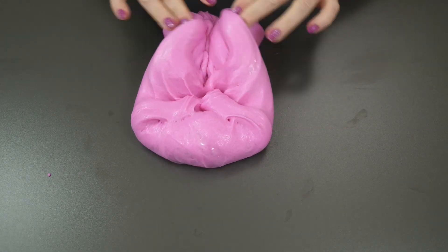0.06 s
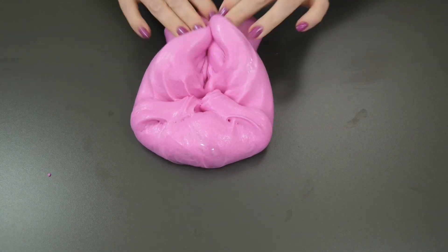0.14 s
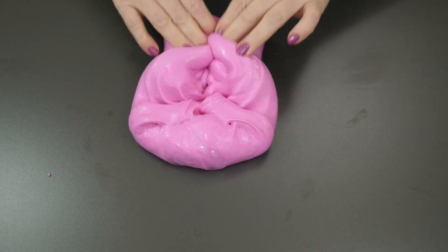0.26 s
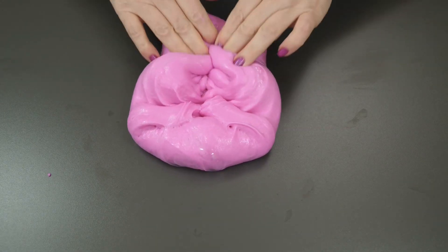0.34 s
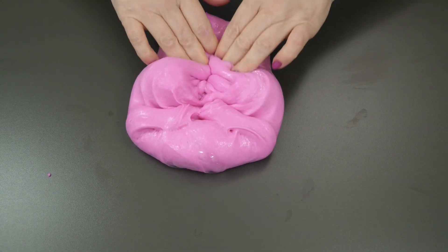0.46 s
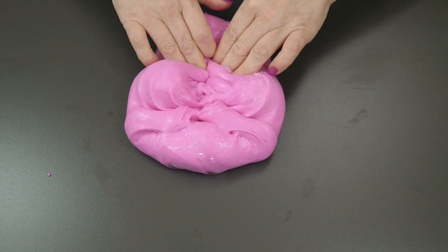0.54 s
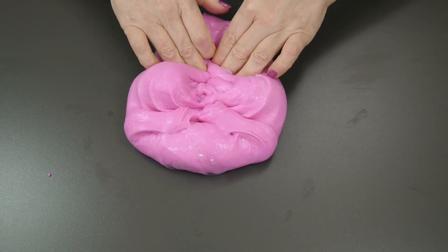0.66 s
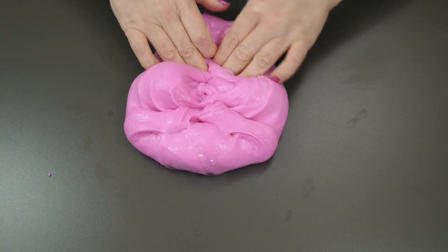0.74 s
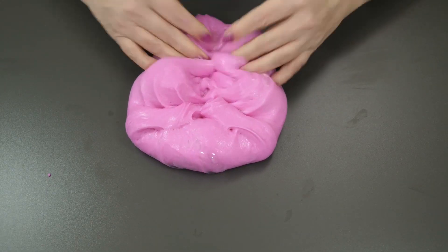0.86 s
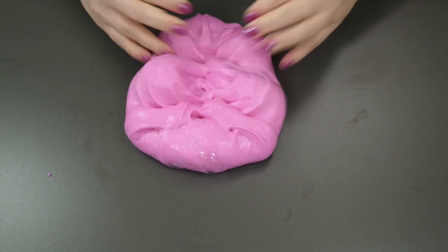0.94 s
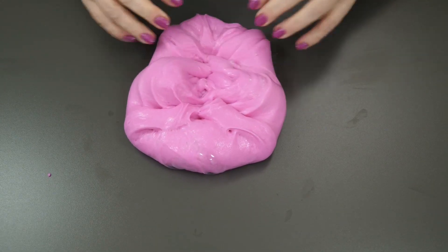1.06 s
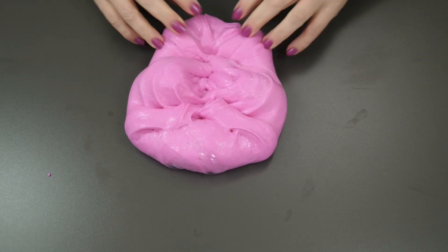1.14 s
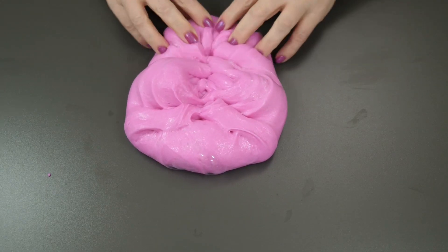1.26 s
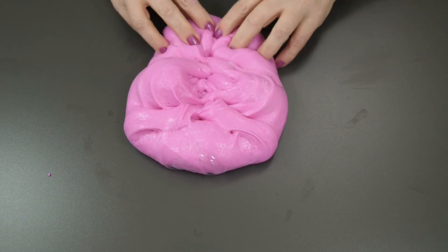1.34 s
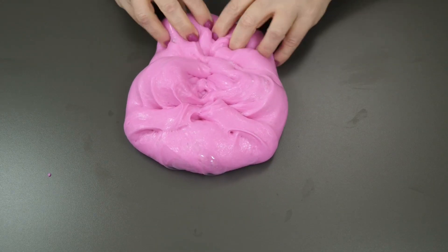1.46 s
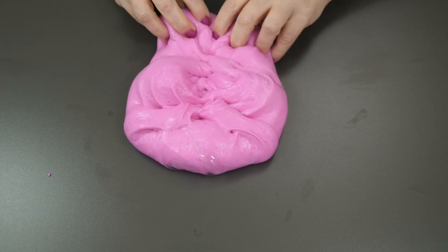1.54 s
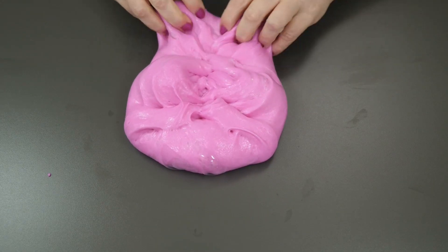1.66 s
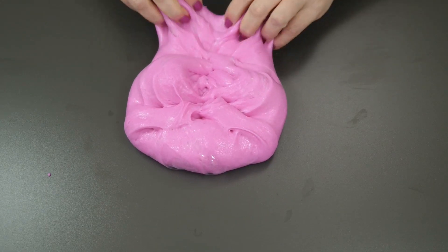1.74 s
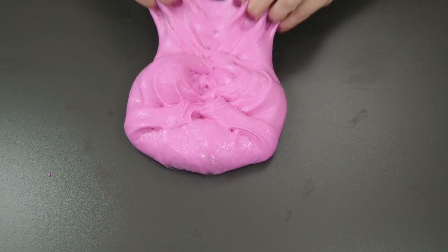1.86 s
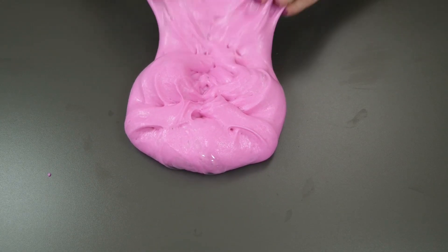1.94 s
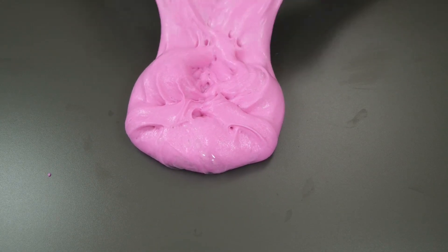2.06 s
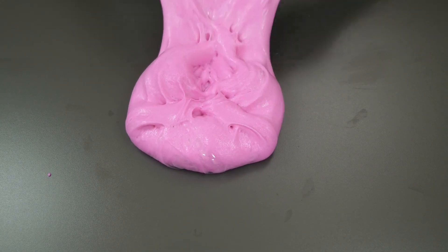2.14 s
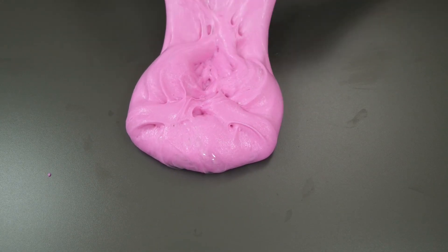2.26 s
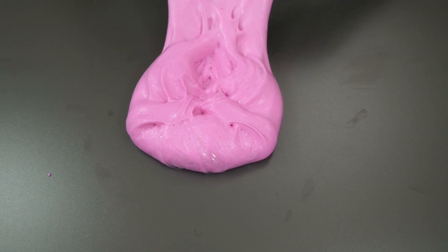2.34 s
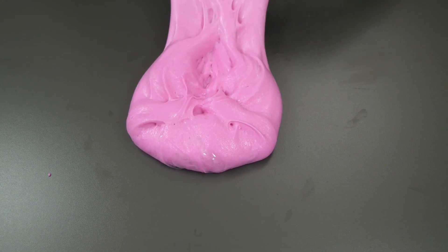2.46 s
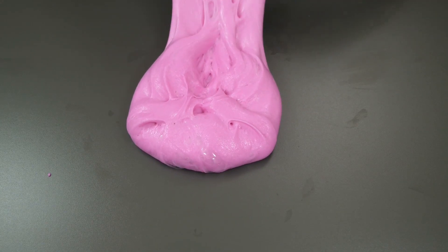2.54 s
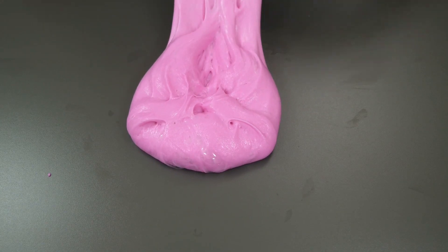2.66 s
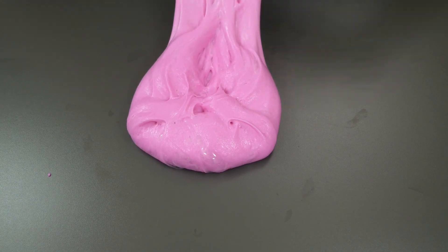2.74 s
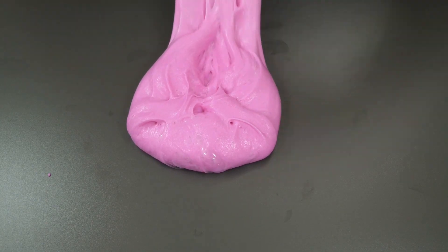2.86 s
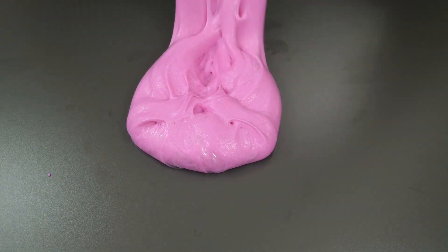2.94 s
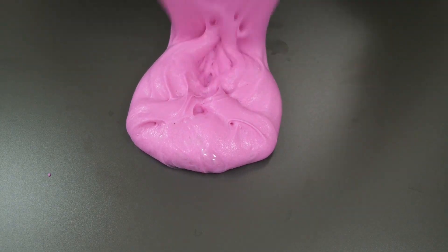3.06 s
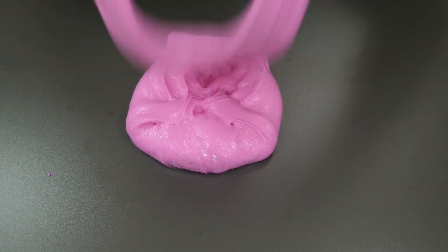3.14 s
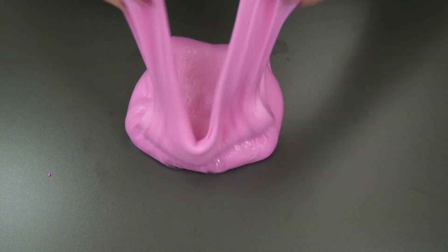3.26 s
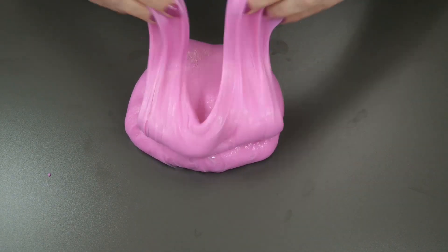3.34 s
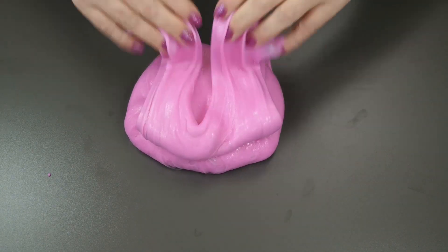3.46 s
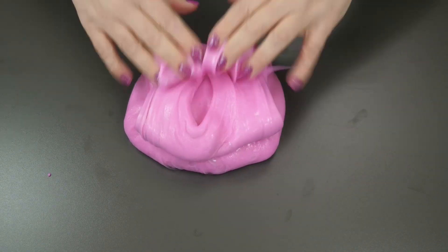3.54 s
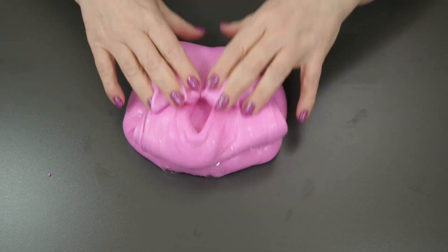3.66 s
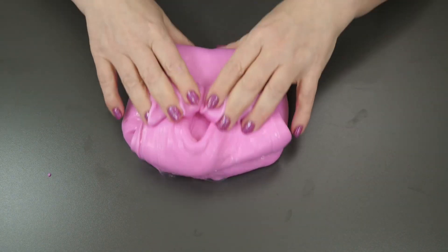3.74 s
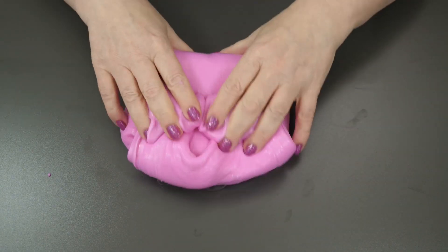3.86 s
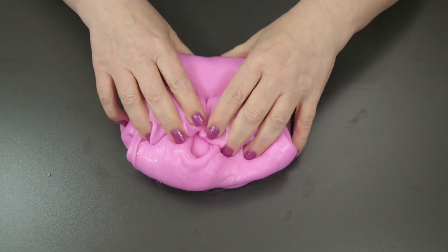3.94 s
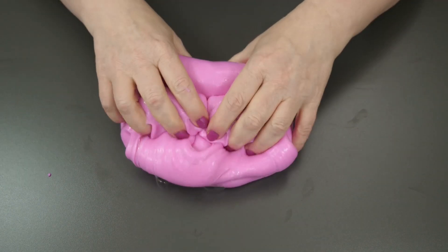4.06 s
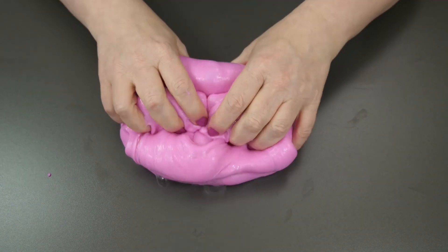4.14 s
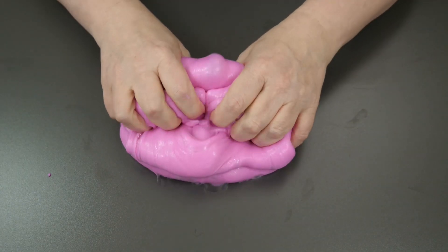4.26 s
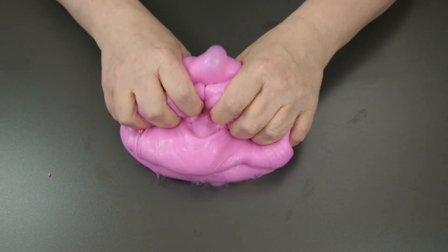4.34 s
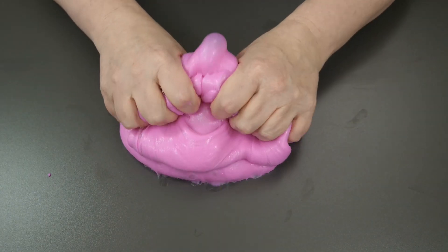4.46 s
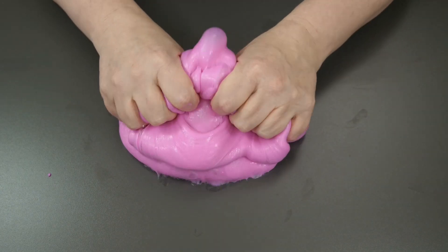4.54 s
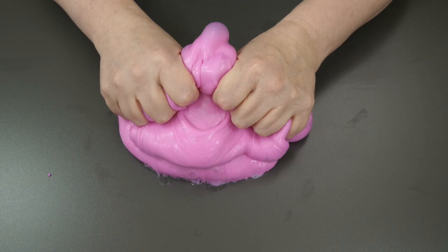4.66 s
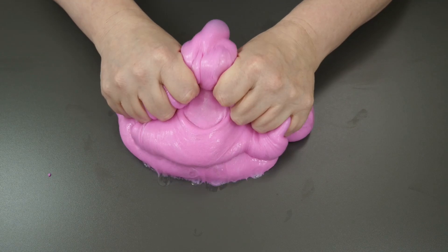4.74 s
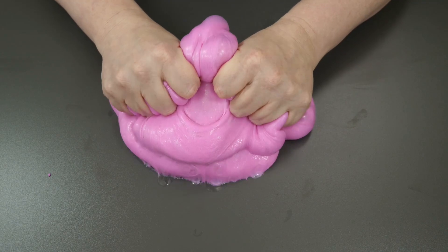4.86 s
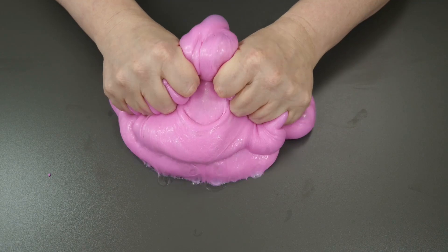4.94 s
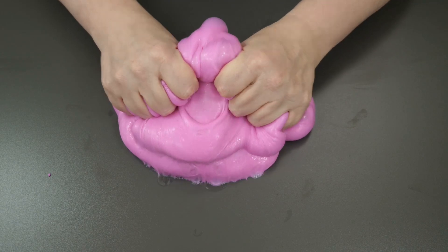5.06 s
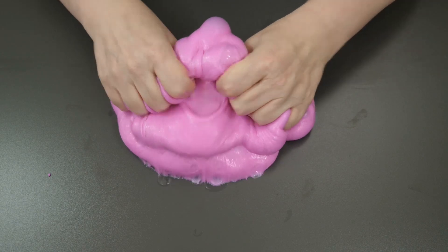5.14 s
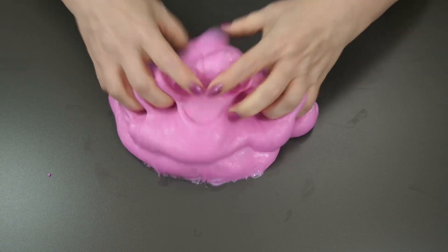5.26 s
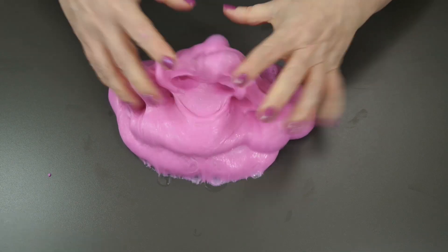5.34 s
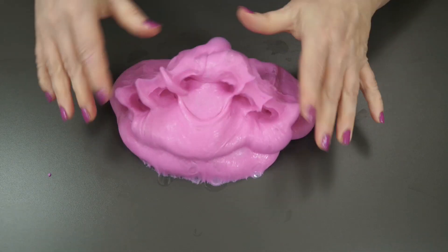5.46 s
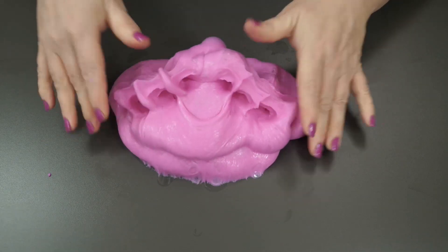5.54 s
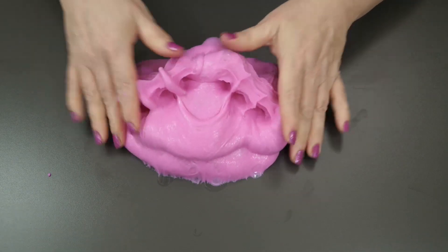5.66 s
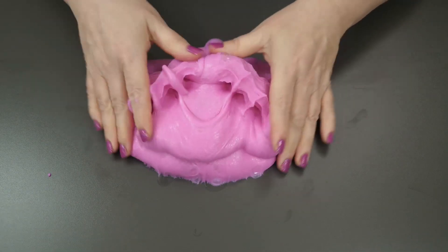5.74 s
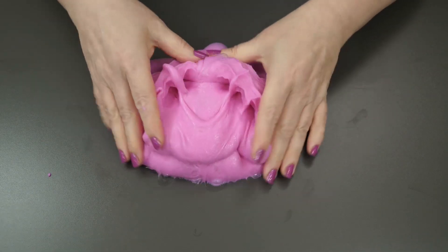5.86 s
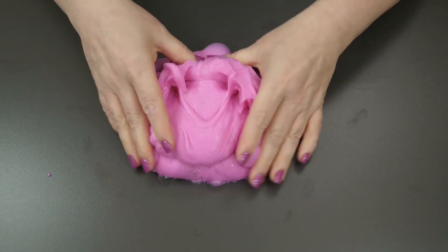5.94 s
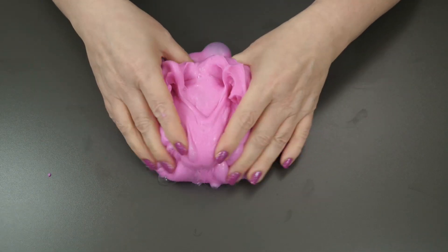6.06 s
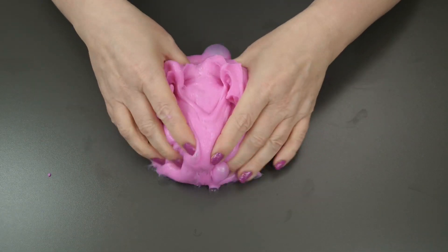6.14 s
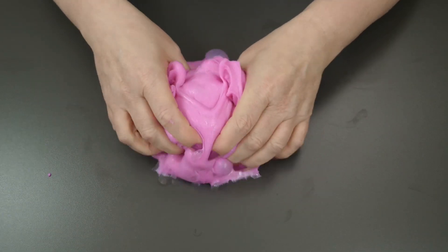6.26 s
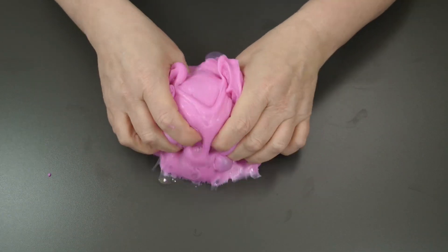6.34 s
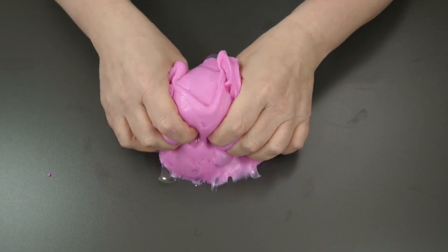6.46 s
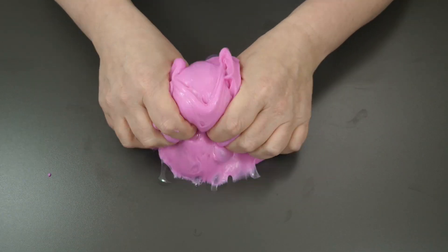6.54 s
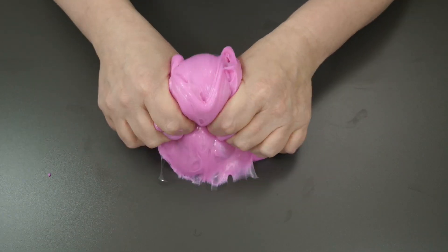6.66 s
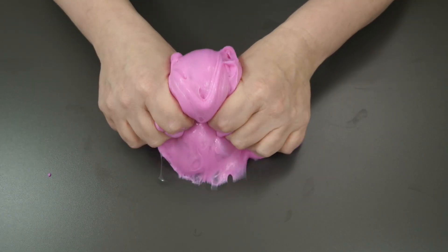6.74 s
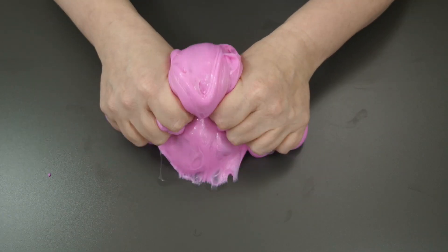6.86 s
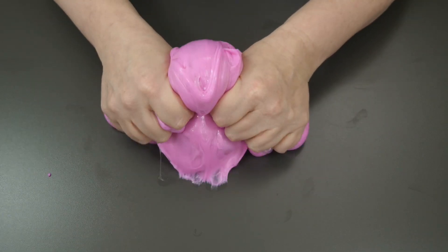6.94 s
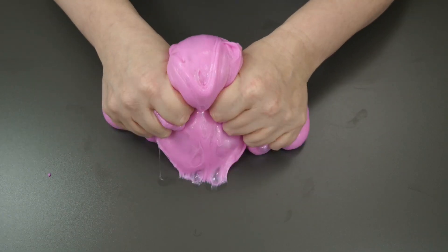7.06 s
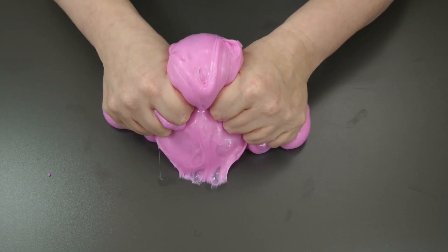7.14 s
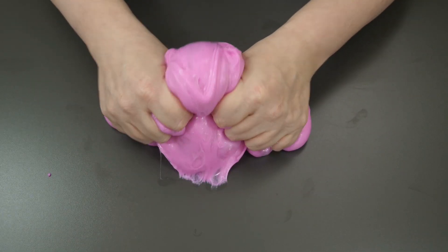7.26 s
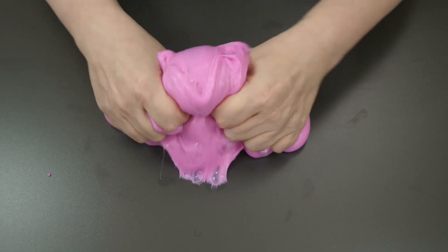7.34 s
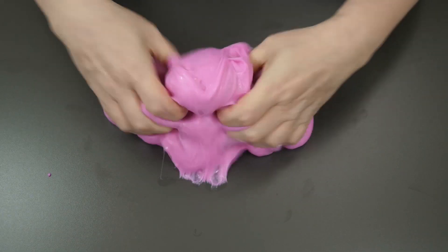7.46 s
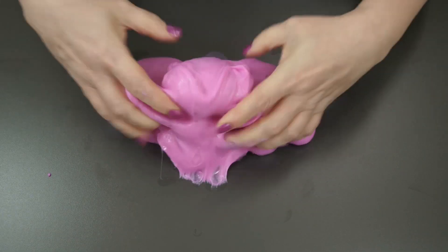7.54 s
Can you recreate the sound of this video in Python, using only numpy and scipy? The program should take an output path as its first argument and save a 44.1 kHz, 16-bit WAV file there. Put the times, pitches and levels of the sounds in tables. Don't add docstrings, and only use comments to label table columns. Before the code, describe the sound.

Wet, sticky crackling heard very close in stereo. Mostly quiet at first, with tiny clicks, one thudding cluster of pops and a smaller fold slap; then a squeeze bursts into bright, irregular snaps and fizzing air. A wet peel and a lull follow, then a second, denser crackle and a final squelchy release. Soft table thuds, short bare-room ring, steady faint hiss.

```python
import sys
import numpy as np
from scipy import signal
from scipy.fft import rfft, irfft
from scipy.io import wavfile
from scipy.ndimage import uniform_filter1d

SR = 44100
rng = np.random.default_rng(int(sys.argv[2]) if len(sys.argv) > 2 else 0)


def makeup_ratio(level_db):
    decades = np.asarray(level_db, float) / 20
    return 10 ** decades


def to_wav(s):
    ch = np.atleast_2d(s).T
    pcm = np.round(np.clip(ch, -1, 1) * 32767)
    wavfile.write(sys.argv[1], SR, pcm.astype(np.int16))


N = 335160

# start_s, length_s, table rumble level_db, wet squelch level_db, sticky fizz level_db
TEARS = [(0.872, 0.077, -51, -32, -37.5), (0.913, 0.01, -60, -28, -30), (0.921, 0.004, -38, -17, -34),
         (0.954, 0.049, -28, -34, -34.5), (3.267, 0.0067, -26, -35, -37), (4.456, 0.06, -58, -27.5, -28),
         (4.544, 0.35, -62, -26.5, -27), (4.864, 0.15, -46, -47, -28), (6.568, 0.12, -60, -46, -37.5),
         (6.394, 0.045, -42, -41, -41), (6.821, 0.081, -57, -34, -23), (6.937, 0.051, -62, -57, -32.5),
         (7.026, 0.098, -65, -31.5, -18), (7.152, 0.05, -62, -44, -30.5)]
# peak_s, length_s, rumble level_db, squelch level_db, fizz level_db
PEELS = [
    (0.04, 0.13, -52, -41.5, -45),
    (3.556, 0.026, -60, -59, -48.5),
    (5.222, 0.092, -48.5, -22, -27.5),
    (1.01, 0.025, -43, -39, -59),
    (5.297, 0.15, -33.5, -29.5, -33.5),
    (5.387, 0.025, -39, -33.5, -35.5),
    (7.46, 0.12, -32, -21, -27),
    (7.577, 0.073, -35, -28.5, -34.5),
]


def rms_one(x):
    return x / np.sqrt(np.mean(x ** 2) + 1e-20)


def at_hz(points, hz, column=1):
    points = np.array(points)
    return np.interp(np.log(hz), np.log(points[:, 0]), points[:, column])


def drift(rate_hz):
    step = 40
    r = np.exp(-2 * np.pi * step * rate_hz / SR)
    noise = rng.standard_normal(N // step + 2002)
    slow = signal.lfilter([1], [1, -2 * r, r * r], noise)[2000:]
    return np.interp(np.arange(N) / step, np.arange(len(slow)), rms_one(slow))


def coloured(pair, spectrum):
    # pitch_hz, likeness (1 = same)
    likeness = [(60, 0.79), (140, 0.45), (300, 0.17), (950, 0.19), (3770, -0.036), (15000, -0.0024)]
    hz = np.maximum(np.fft.rfftfreq(N, 1 / SR), 1)
    mid, side = rfft(pair) * makeup_ratio(at_hz(spectrum, hz))
    alike = np.clip(at_hz(likeness, hz), -1, 1)
    stereo = np.sqrt(1 + alike) * mid + np.sqrt(1 - alike) * side * [[1], [-1]]
    return rms_one(irfft(stereo, N))


def grains(per_s, spread_db):
    sizes = makeup_ratio(spread_db * np.minimum(rng.exponential(1, (2, N)), 5))
    signs = rng.choice([-1, 1], (2, N))
    return sizes * signs * (rng.random((2, N)) < per_s / SR)


def add(track, s, wave):
    i = round(s * SR)
    track[:, i:i + wave.shape[1]] += wave[:, :N - i]


def burst(hz, cycles, lag_s, tear, rough, swell, chance):
    t = np.arange(chance.shape[1]) / SR - np.array([[lag_s / 2], [-lag_s / 2]]) - 1e-4
    turns = np.maximum(t, 0) * hz
    band = signal.butter(1, [hz / 1.8, min(hz * 1.67, .45 * SR)], "band", fs=SR, output="sos")
    ragged = rms_one(signal.sosfilt(band, chance))
    ring = (np.sin(2 * np.pi * turns) + rough * ragged) * turns ** swell * np.exp(-turns / cycles)
    wave = ring + tear * turns * np.exp(-turns / 0.17)
    return wave / np.max(np.abs(wave))


def hiss():
    # pitch_hz, level_db per Hz
    hiss_colour = [(59, -13), (100, -2.5), (302, -7), (1100, -15.5), (1230, -16), (11400, -23),
                   (15000, -23), (16000, -21)]
    return makeup_ratio(-53.5) * coloured(rng.standard_normal((2, N)), hiss_colour)


def room(x):
    # pitch_hz, time to fall 60 dB in s, level_db
    wall_ring = [(143, 0.35, 1.5), (700, 0.26, -4), (2470, 0.31, -1), (6500, 0.083, 5), (11800, 0.19, -7)]
    t = np.arange(SR // 2) / SR
    white, tail = rng.standard_normal((2, len(t))), 0
    edges = 60 * 2.25 ** np.arange(8)
    for k, (low, high) in enumerate(zip(edges, edges[1:])):
        hz = np.sqrt(low * high)
        band = signal.sosfilt(signal.butter(2, [low, high], "band", fs=SR, output="sos"), white)
        alike = np.clip(350 / hz, 0, .95)
        band = np.sqrt(1 + alike) * band[0] + np.sqrt(1 - alike) * band[1] * [[1], [-1]]
        fade_db = at_hz(wall_ring, hz, column=2) - 60 * t / at_hz(wall_ring, hz)
        tail = tail + (-1) ** k * band * makeup_ratio(fade_db)
    tail = tail * np.clip((t - .0025) / 0.000047, 0, 1) / np.sqrt(0.088 * SR)
    return signal.fftconvolve(x.mean(axis=0, keepdims=True), tail, axes=1)[:, :N]


def early_echoes(x):
    # delay_s, level_db
    surfaces = [
        (.00136, -8.5),
        (.0037, -23),
    ]
    out = x.copy()
    for s, db in surfaces:
        out += makeup_ratio(db) * np.pad(x, ((0, 0), (round(s * SR), 0)))[:, :N]
    return out


def handwork():
    # start_s, weight on the table level_db, stretch of the skin level_db
    hands = [(0, -45, -54), (.3, -48, -60), (.8, -47.5, -60), (1.25, -46, -64.5), (1.42, -41, -45.5),
             (1.475, -50, -47.5), (1.53, -45, -45), (1.66, -51, -54), (1.8, -47, -47.5), (1.87, -48.5, -41),
             (2.15, -50.5, -60), (3.3, -48, -60.5), (3.53, -47, -55.5), (3.7, -45.5, -54.5),
             (4.0, -49, -52.5), (4.4, -47, -54), (5.1, -50.5, -50.5), (5.6, -43.5, -63.5),
             (5.95, -39, -49.5), (6.6, -45, -53), (7.6, -49.5, -48)]
    s, weight_db, stretch_db = np.transpose(hands)
    t = np.arange(N) / SR
    return np.interp(t, s, weight_db), np.interp(t, s, stretch_db)


def tearing(steady_db, column, lag_s=0, pace=1):
    sag_db_per_s, fall_db_per_s = 101.5, 295
    events = np.transpose(TEARS + PEELS)[:, :, None]
    start, length, peaks_db = events[0], events[1], events[column]
    rise_db_per_s = np.repeat([20000, 325], [len(TEARS), len(PEELS)])[:, None]
    t = np.arange(0, N, 32) / SR
    since = t - start - lag_s
    loss_db = (rise_db_per_s * np.maximum(-since, 0)
               + sag_db_per_s * np.clip(since, 0, length)
               + fall_db_per_s * np.maximum(since - length, 0))
    power = np.sum(makeup_ratio(peaks_db - pace * loss_db) ** 2, axis=0)
    return np.sqrt(np.interp(np.arange(N) / SR, t, power) + makeup_ratio(steady_db) ** 2)


def rumble(weight_db):
    # pitch_hz, level_db per Hz
    rumble_colour = [(12, -25), (28, 6), (49, 5.5), (87, 0), (118, -11.5), (216, -14), (390, -22),
                     (660, -120)]
    shaking = tearing(weight_db, column=2, lag_s=0.014, pace=0.6) * makeup_ratio(1.1 * drift(3.1))
    return shaking * coloured(rng.standard_normal((2, N)), rumble_colour)


def squelch(stretch_db, clumps_db):
    # pitch_hz, level_db per Hz
    squelch_colour = [(88, -42), (150, -3), (1130, -6), (1470, -7), (3610, -9.5), (6000, -14.5),
                      (7800, -46.5), (13200, -120)]
    loudness = tearing(stretch_db, column=3) * makeup_ratio(clumps_db - 3.5)
    return loudness * coloured(grains(2200, 1.06), squelch_colour)


def fizz(stretch_db, clumps_db):
    # pitch_hz, level_db per Hz
    fizz_colour = [(2060, -17.5), (3500, -10.5), (6090, -7), (11200, -5.5), (14700, -9.5), (16000, -4.5)]
    loudness = tearing(stretch_db - 2.5, column=4) * makeup_ratio(clumps_db + 2.5)
    return loudness * coloured(grains(8000, 0.85), fizz_colour)


def knocks():
    # start_s, peak level_db, strongest pitch_hz
    blows = [(0.086, -37, 152), (0.869, -20.5, 206), (0.921, -16.5, 220), (0.884, -16.5, 233),
             (0.952, -18.5, 180), (0.995, -22, 213), (2.793, -36.5, 282), (3.276, -22, 219),
             (3.276, -18, 404), (4.107, -37, 260), (4.149, -35, 226), (4.239, -36.5, 233),
             (4.455, -13.5, 306), (4.548, -14.5, 270), (4.833, -27, 635), (5.203, -15, 180),
             (5.358, -19.5, 278), (6.398, -23.5, 217), (6.537, -39, 593), (7.024, -27.5, 634),
             (7.211, -36.5, 296), (7.449, -15, 700), (7.445, -20, 314), (7.46, -11, 323),
             (7.477, -11.5, 352), (7.504, -18, 235), (5.979, -35, 320)]
    # pitch_hz, level_db, time to fall 60 dB in s
    table_notes = [(91, -5, 0.051), (180, -15, 0.15), (223.7, -3, 0.081), (322.2, -3, 0.065),
                   (429, -19.5, 0.1), (533, -10, 0.02), (603, -0.5, 0.056)]
    out, t = np.zeros((2, N)), np.arange(SR // 4) / SR
    chance = rng.standard_normal((len(blows), len(table_notes), 2))
    mode_hz, mode_db, t60 = np.transpose(table_notes)[:, :, None]
    for (s, db, hz), luck in zip(blows, chance):
        strength_db = mode_db - 11 * abs(np.log2(mode_hz / hz)) + 4.2 * luck[:, :1]
        ring = np.sin(2 * np.pi * mode_hz * (1 + 0.037 * luck[:, 1:]) * t)
        wave = (makeup_ratio(strength_db - 60 * t / t60) * ring).sum(axis=0)
        wave = wave * (1 - np.exp(-t / 0.0039))
        wave = wave * (1 + 0.26 * np.exp(-t / 0.0012))
        add(out, s, makeup_ratio(db - 7.5) * wave[None] / np.max(np.abs(wave)))
    return out


def vents():
    # start_s, level_db, throat pitch_hz
    jets = [
        (4.552, -19, 4300),
        (4.847, -34, 4000),
        (6.827, -27, 4000),
        (6.196, -43, 4600),
        (6.399, -30, 3600),
        (3.279, -41, 4000),
    ]
    t60_s, width = 0.4, 1.27
    out, t = np.zeros((2, N)), np.arange(SR // 4) / SR
    for (s, db, hz), air in zip(jets, rng.standard_normal((len(jets), 3, len(t)))):
        throat = signal.butter(2, [hz / width, hz * width], "band", fs=SR, output="sos")
        sputter = makeup_ratio(3.3 * rms_one(uniform_filter1d(air[2], size=100)))
        jet = rms_one(signal.sosfilt(throat, air[:2] * sputter))
        add(out, s, makeup_ratio(db - 60 * t / t60_s) * jet)
    return out


def pops():
    # start_s, peak level_db, hollow pitch_hz
    fold = [(0.475, -31, 4300), (0.5028, -35, 2720), (0.6115, -31, 2780), (0.8709, -22, 1030),
            (0.887, -28, 895), (0.9145, -22, 4200), (0.918, -22, 3000), (0.9232, -17, 2790),
            (0.925, -10, 3300), (0.9295, -8, 3300), (1.723, -35, 2600), (3.19, -45, 1500),
            (1.891, -38, 2000), (3.2713, -28, 2200), (3.271, -29, 4600), (3.2763, -16, 2800),
            (3.2772, -19, 4530), (3.278, -23, 920), (3.638, -37, 1210), (3.687, -31, 2700),
            (3.732, -33, 4000), (3.782, -35, 2980), (3.8208, -28, 3600), (3.826, -28, 4160),
            (3.8539, -33.5, 3230), (3.9336, -32.5, 2200), (4.002, -31, 680), (4.0037, -25.5, 3860),
            (4.187, -37, 700), (4.2235, -35, 1490), (4.035, -38, 1300), (3.931, -38, 790),
            (4.4419, -29, 3930)]
    # start_s, peak level_db, hollow pitch_hz
    squeeze = [(4.4562, -6, 2500), (4.458, -18.5, 573), (4.4593, -18, 4000), (4.5517, -11, 2300),
               (4.5534, -5, 4100), (4.5554, -5, 5040), (4.5567, -10, 4300), (4.6071, -20, 4500),
               (4.8479, -20, 4000), (4.5647, -9, 4300), (4.7686, -19, 4830), (4.835, -24.5, 990),
               (4.8729, -9, 4600), (4.9137, -25, 2900), (5.213, -10, 2480), (5.215, -12, 2200),
               (5.221, -10, 4300), (5.225, -13, 2500), (5.275, -21, 4300), (5.227, -9, 3300),
               (5.417, -28, 840)]
    # start_s, peak level_db, hollow pitch_hz
    wring = [(6.1953, -20, 4300), (6.3981, -4, 4560), (6.5415, -16, 3480), (6.5676, -20, 4300),
             (6.646, -30, 4560), (6.727, -30, 3260), (6.8038, -15, 3500), (6.8079, -25, 4500),
             (6.4015, -19, 4200), (6.8243, -7.5, 3520), (6.828, -16, 4500), (6.8404, -5, 4200),
             (6.8438, -16, 4500), (6.9397, -22, 4500), (6.938, -19.5, 2970), (6.958, -18, 5020),
             (6.9922, -22, 4670), (7.0311, -5, 2390), (7.0322, -3, 5600), (7.0352, -8, 4600),
             (7.0667, -18, 2800), (7.1735, -22, 2270), (7.197, -27, 2760), (7.312, -32, 2310),
             (6.681, -36, 2000), (7.4474, -10, 1900), (7.4724, -14, 4300), (7.4762, -6, 4100),
             (7.48, -16, 4200), (7.5305, -19, 1140)]
    # start_s, peak level_db, hollow pitch_hz
    bubbles = [(0.929, -16, 1450), (0.9325, -20.5, 917), (4.2229, -36.5, 4360), (4.8433, -9.5, 4110),
               (5.224, -12, 4100), (2.797, -44, 1920), (3.46, -47, 1370), (4.5511, -4, 4400),
               (5.971, -38, 960), (5.9758, -30.5, 1370), (5.985, -39, 1480)]
    ragged_cycles, round_cycles = 0.55, 1.64
    ragged_pockets = fold + squeeze + wring
    pockets = ragged_pockets + bubbles
    rings = np.repeat([ragged_cycles, round_cycles], [len(ragged_pockets), len(bubbles)])
    out, chance = np.zeros((2, N)), rng.standard_normal((len(pockets), 2, 768))
    for (s, db, hz), ring, noise in zip(pockets, rings, chance):
        ragged = ragged_cycles / ring
        lag_s = 7e-5 * np.clip(noise[0, 0], -1.3, 1.3)
        wave = burst(hz, ring, lag_s, tear=1.47 * ragged, rough=0.6 * ragged ** 2, swell=0.97, chance=noise)
        add(out, s - ring / hz - 1e-4, makeup_ratio(db + 2.5) * wave)
    return out


def snaps():
    # start_s, peak level_db, ring pitch_hz, left lag in microseconds
    fold = [(0.0185, -31, 9190, -23), (0.0265, -27, 10080, -17), (0.0278, -30, 10000, 0),
            (0.089, -30, 7450, -45), (0.2986, -38, 11000, 0), (0.3951, -29, 10680, 0),
            (0.418, -38, 11000, 20), (0.4275, -34, 12790, -40), (0.4311, -35, 11000, -40),
            (0.4752, -34, 8420, -28), (0.5026, -26, 7580, -11), (0.6274, -32, 11860, -34),
            (0.634, -33, 11000, 0), (0.871, -21, 10470, 0), (1.39, -35, 10500, 0),
            (1.4313, -29, 11890, -17), (1.7234, -30, 11740, 23), (1.7489, -25, 11070, 28),
            (2.2833, -36, 10700, -113), (2.7105, -38, 11000, 0), (3.2764, -19, 11220, -34),
            (3.3295, -32, 11000, -30), (3.6385, -35, 9370, 45), (3.7307, -34, 10400, -40),
            (3.7366, -36, 11000, 30), (3.762, -38, 10000, 0), (3.7817, -26, 9600, 11),
            (3.8211, -29, 8810, -62), (3.8635, -34, 9990, 6), (3.9312, -12, 10270, -68),
            (4.0025, -26, 12700, -136), (4.0327, -32, 12580, 23), (4.0363, -32, 11000, -20),
            (4.1733, -28, 12170, 6), (4.2174, -35, 11000, 0), (4.2229, -21, 9780, -45),
            (4.3427, -36, 11860, -68)]
    # start_s, peak level_db, ring pitch_hz, left lag in microseconds
    squeeze = [(4.4357, -37, 9000, 0), (4.4419, -28, 11860, -40), (4.4508, -22, 14380, -113),
               (4.456, 2, 9300, -96), (4.4593, -14, 8000, -40), (4.4608, -14, 7900, 23),
               (4.4694, -8, 9820, -23), (4.5455, 3, 10500, -91), (4.5469, -14, 7000, -91),
               (4.5515, -9, 8700, -96), (4.5529, -14, 11000, -60), (4.6072, -16, 12340, -74),
               (4.6668, -23, 9150, -119), (4.6765, -16, 10830, 17), (4.6896, -17, 12040, 0),
               (4.7114, 1, 10870, 17), (4.7138, -15, 12000, 17), (4.7149, -12, 10500, -30),
               (4.7171, -18, 10000, 17), (4.7686, -12, 10060, 17), (4.8157, -27, 8740, 113),
               (4.8248, -26, 12140, -34), (4.8368, -14, 10720, 113), (4.8399, -21, 10790, 17),
               (4.8441, -15, 10500, 34), (4.8452, -23, 12000, 0), (4.8716, -14, 12500, 0),
               (4.873, 3.5, 11860, 6), (4.8772, -11, 11500, 6), (4.8779, -12, 9500, 17),
               (4.8942, -6, 11110, 23), (4.9139, -13, 10810, 11), (4.916, -16, 12500, 11),
               (4.9168, -21, 9000, -23), (4.9302, -14, 10850, 23), (4.9356, -10, 11000, 34),
               (4.9472, -18, 10500, -102), (4.9729, -15, 12700, -40), (4.9758, -16, 10860, -62),
               (4.978, -17, 11500, 0), (4.9824, -16, 10940, 17), (5.0062, -22, 10620, 28),
               (5.0115, -28, 10300, 0), (5.4056, -27, 10000, -30), (5.2154, -14, 10500, 30),
               (5.213, -6, 10600, 0), (5.221, -13, 7600, 20), (5.2248, -10, 7390, -17),
               (5.2272, -13, 8000, 0), (5.3575, -24, 9500, 0)]
    # start_s, peak level_db, ring pitch_hz, left lag in microseconds
    gather = [(5.6454, -42, 7000, 0), (5.9498, -34, 10500, 0), (5.9653, -34, 10500, 20),
              (6.0793, -29, 10590, -136), (6.1409, -23, 9430, -11), (6.1712, -23, 11500, 23),
              (6.1952, -15, 10830, 0), (6.2394, -26, 10270, -125), (6.6541, -30, 11500, 0),
              (6.3334, -34, 11000, 20), (6.3659, -20, 12500, 0), (6.3645, -20, 13500, 34),
              (6.398, -25, 8140, 136), (6.4866, -30, 11090, -62), (6.5419, -17, 11500, 28),
              (6.5694, -13, 12000, -62), (6.5794, -7, 14560, 28), (6.6165, -24, 10360, -79),
              (6.633, -24, 11500, -23), (6.6374, -20, 11280, 23), (6.646, -20, 12940, 11),
              (6.6473, -20, 12500, -20), (6.7269, -32, 11260, 45), (6.7632, -20, 12250, 17),
              (6.776, -16, 12750, 17)]
    # start_s, peak level_db, ring pitch_hz, left lag in microseconds
    wring = [(6.8036, 1, 12660, 17), (6.8237, 6, 11800, 17), (6.825, 1, 12000, 17),
             (6.8266, -12, 10500, -30), (6.8403, 2, 11200, -11), (6.8125, -19, 11500, 0),
             (6.9067, -12, 11650, -68), (6.908, -14, 9500, 30), (6.9383, -7, 9800, 34),
             (6.9264, -25, 9000, 0), (6.9398, -15, 11000, 0), (6.9579, -14, 12500, -23),
             (6.9922, 1, 12000, 11), (7.0111, -16, 6870, 28), (7.021, -20, 11000, 0), (7.0313, 2, 10500, 0),
             (7.0327, 1, 11500, 17), (7.0619, -6, 10400, -136), (7.0667, -5, 9350, 11),
             (7.1282, -17, 12500, 0), (7.1296, -21, 12000, 0), (7.1318, -14, 11500, -102),
             (7.1444, -8, 12490, -102), (7.157, -3, 10500, -102), (7.1593, -20, 11500, 0),
             (7.1773, -19, 12000, 0), (7.1732, -6, 12000, -28), (7.2095, -19, 9670, 62),
             (7.3135, -33, 12200, 0), (7.3458, -38, 7800, -30), (7.4206, -29, 11200, 0),
             (7.4352, -20, 9500, 30), (7.4433, -17, 12000, 0), (7.4517, -18, 8000, 30),
             (7.4724, -20, 7500, 0), (7.4757, -12, 12000, 0), (7.48, -21, 10000, 0), (7.4419, -3, 7150, 51),
             (7.4477, -11, 7240, 45), (7.4754, -11, 8180, -17)]
    films = fold + squeeze + gather + wring
    out, chance = np.zeros((2, N)), rng.standard_normal((len(films), 2, 96))
    for (s, db, hz, lag_us), noise in zip(films, chance):
        ears = makeup_ratio(db + 3.5 + 0.019 * lag_us * np.array([[-1], [1]]))
        wave = burst(hz, 1.2, lag_us / 1010000.0, tear=0.021, rough=0.3, swell=0.35, chance=noise)
        add(out, s - .0002, ears * wave)
    return signal.lfilter([1, -0.55], [1], out)


def scene():
    weight_db, stretch_db = handwork()
    clumps_db = 1.65 * drift(64)
    kneading = rumble(weight_db) + squelch(stretch_db, clumps_db) + fizz(stretch_db, clumps_db)
    no_bass = signal.butter(2, 450, "high", fs=SR, output="sos")
    clicks = signal.sosfilt(no_bass, snaps() + pops())
    booms = knocks()
    diffuse = room(clicks + 0.4 * booms) + kneading + hiss() + vents()
    top = signal.cheby2(10, 50, 16300, fs=SR, output="sos")
    return early_echoes(clicks) + booms + signal.sosfilt(top, diffuse)


def top_cut(x):
    return signal.sosfilt(signal.butter(12, 16540, fs=SR, output="sos"), x)


def record(dry):
    # pitch_hz, width_hz, level_db
    housing_dip = (5950, 540, -4)
    hz, width_hz, db = housing_dip
    band = signal.lfilter(*signal.iirpeak(hz, hz / width_hz, fs=SR), dry)
    pair = (dry - (1 - makeup_ratio(db)) * band) * makeup_ratio([[0.6], [-0.6]])
    top = signal.cheby2(12, 60, 16600, fs=SR, output="sos")
    cut = signal.sosfilt(top, np.clip(pair, -1, 1))
    return top_cut(np.clip(cut, -1, 1))


dry = scene()
out = record(dry)
to_wav(out)
```